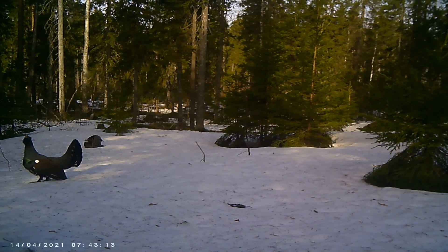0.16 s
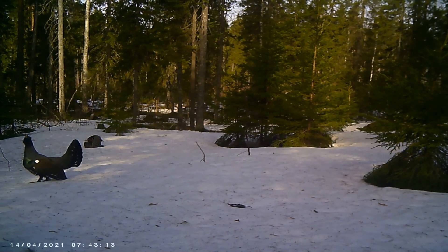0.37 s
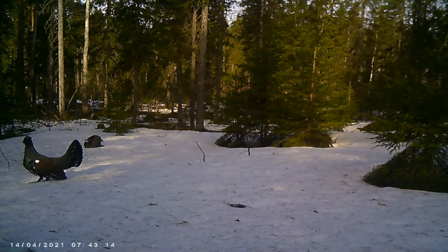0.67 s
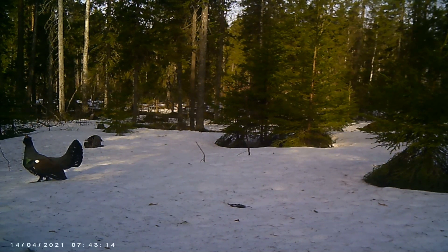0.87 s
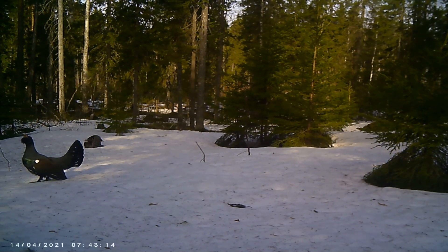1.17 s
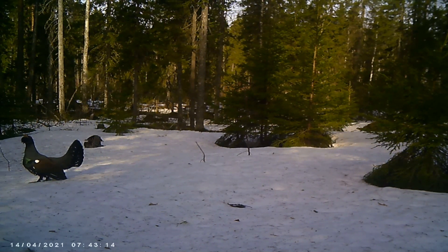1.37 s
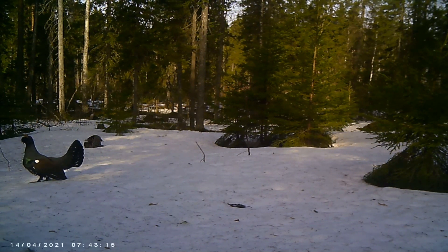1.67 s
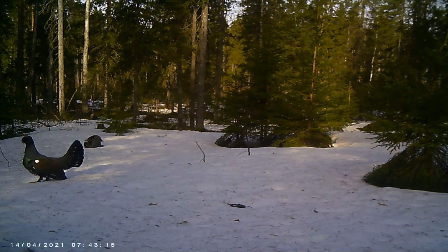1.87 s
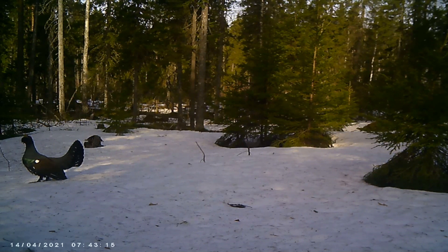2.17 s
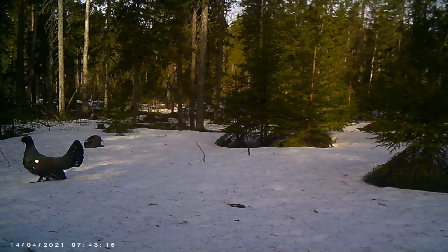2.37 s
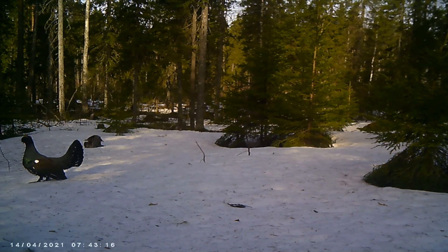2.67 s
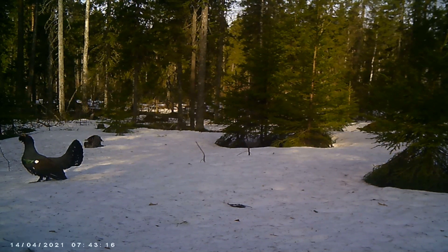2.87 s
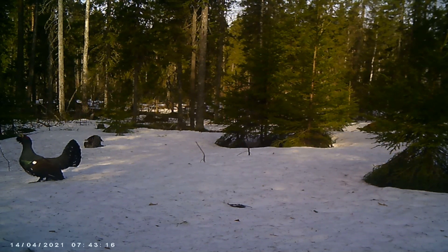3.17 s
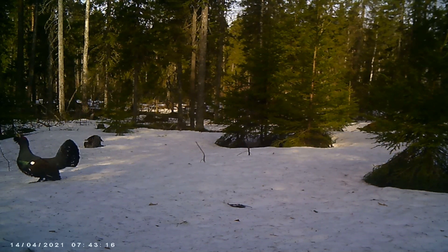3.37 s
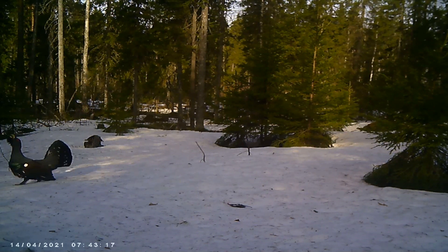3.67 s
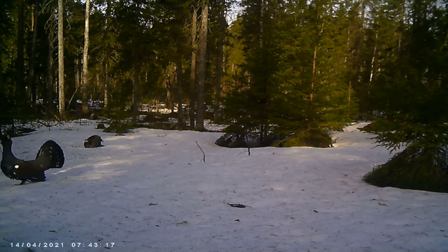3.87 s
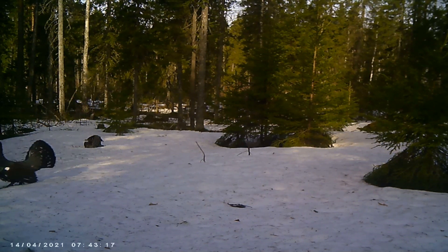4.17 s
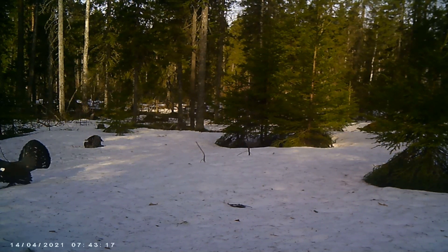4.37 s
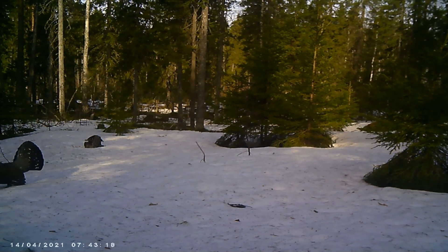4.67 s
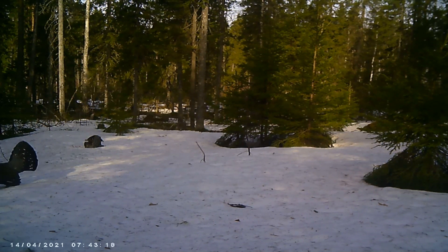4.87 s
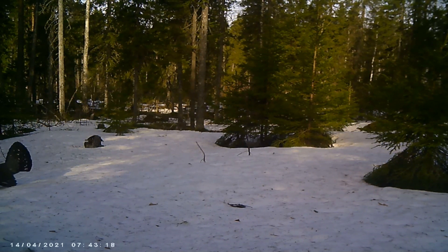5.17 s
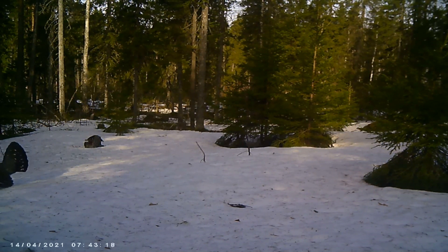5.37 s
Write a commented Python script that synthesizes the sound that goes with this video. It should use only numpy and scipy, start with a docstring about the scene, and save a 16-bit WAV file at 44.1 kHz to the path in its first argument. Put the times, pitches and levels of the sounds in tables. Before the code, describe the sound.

A large forest bird gives dry clicks that quicken into a trill, then hissing scrapes, over faint hiss and low rumble.

```python
"""A snowy forest edge, a displaying capercaillie close to the microphone of a trail camera.
Pairs of dry clicks ring its windpipe and speed up into a trill; then it whets, air rasping through
throat and beak in hissing scrapes, and steps through the crust. Farther off the trees answer faintly.
Underneath lie the camera's own hiss, rumble, thin whine and low bumps, and at first a brief whistle."""
import sys
import numpy as np
from scipy import signal
from scipy.fft import rfft, irfft, next_fast_len
from scipy.io import wavfile
from scipy.ndimage import map_coordinates

SR = 44100
rng = np.random.default_rng(int(sys.argv[2]) if len(sys.argv) > 2 else 0)


def bounce(signal):
    """Save signal as a 16-bit WAV file at the path given by the first command-line argument."""
    frames = np.transpose(np.atleast_2d(signal))
    limited = np.clip(frames, -1, 1)
    pcm = np.round(limited * 32767).astype(np.int16)
    wavfile.write(sys.argv[1], SR, pcm)


N = 243873
TIME = np.arange(N) / SR

# Levels in the tables are relative; each source sets its own gain.
# the camera's hiss and rumble spectra: f/Hz, level/dB
CAMERA_HISS = [(59, -40), (100, 4.5), (140, -5.5), (477, -9), (1160, -18.5), (2180, -22), (2520, -24.5),
               (5280, -26), (9950, -28), (11300, -26), (12000, -30), (14200, -29), (15500, -38.5)]
CAMERA_RUMBLE = [(15, 10), (40, 0.5), (65, 2.5), (110, -17.5), (200, -14.5), (400, -41.5)]
# one cycle of low bumps in the camera: t/s, level/dB
CAMERA_BUMPS = [(0.18, -40), (0.261, -35.5), (0.596, -35.5), (0.734, -43), (.979, -35), (1.148, -40),
                (1.217, -35), (1.376, -41), (1.539, -36), (1.771, -44), (1.941, -36)]
# tones of the thin whistle: f/Hz, level/dB
WHISTLE_TONES = [(2140, -80.5), (4110, -75), (6290, -79)]
# reverberation among the trees: f/Hz, time to fall 60 dB/s
FOREST_DECAY = [(300, 1), (2500, 0.42), (5000, 0.35), (10000, 0.71)]
# crunches underfoot: t/s, level/dB, length/s
FOOTFALLS = [(3.483, -59, 0.031), (3.54, -66, 0.036), (3.86, -57.5, 0.023), (3.906, -56, 0.015),
             (3.949, -53.5, 0.027), (4.052, -58.5, 0.022), (4.211, -55.5, 0.056), (4.281, -48.5, 0.0051),
             (4.675, -47, 0.023), (4.784, -56, 0.023), (4.876, -52, 0.041), (5.075, -49.5, 0.021),
             (5.097, -53, 0.014), (5.387, -58, 0.0097), (5.525, -59, 0.024)]
# spectrum of crushed snow: f/Hz, level/dB
SNOW_SPECTRUM = [(120, 18), (280, 6), (500, 2), (1200, 2), (3500, 1.5), (6000, 4), (10000, 4.5),
                 (13000, -2.5), (15500, -20)]
# whetting strokes: t/s, hold/s, throat level/dB, hiss level/dB, beak level/dB, swell over the hold/dB,
# throat start f/Hz, throat end f/Hz, beak f/Hz
WHET_STROKES = [(4.02, .006, -61.5, -52.5, -64, 3.5, 2470, 2600, 7850),
                (4.114, 0.0457, -54.5, -59.5, -62, -1, 2482, 2170, 9100),
                (4.264, 0.02, -60, -50, -60, 2.5, 2487, 2800, 8606),
                (4.346, .017, -41, -44.5, -53, 3.5, 2192, 2830, 8204),
                (4.454, 0.014, -45, -49, -50.5, 0, 2790, 2320, 8550),
                (4.543, 0.015, -73.5, -59.5, -73.5, -0.5, 2158, 2210, 7500),
                (4.583, 0.0217, -42.5, -42, -53.5, -1, 2577, 3043, 8250),
                (4.666, .036, -41, -43, -65, -6, 2876, 2139, 7980),
                (4.716, 0.031, -43, -43.5, -55.5, 0, 2620, 2430, 8700),
                (4.881, 0.038, -41, -44, -53.5, 0, 2522, 2727, 8040),
                (4.921, 0.01596, -38, -48, -48, 1, 2694, 3160, 7390),
                (4.978, 0.0065, -56, -57.5, -61, 0, 2536, 2470, 9240),
                (5.082, 0.017, -45, -44.5, -53.5, -3.5, 2750, 3006, 8550),
                (5.166, 0.015, -47, -48.5, -57, 2.5, 2430, 2832, 8570),
                (5.243, 0.067, -42.5, -44, -53, -3.5, 2637, 2257, 8220)]
# three sets of resonances that glide together: ratio to the main one, width/Hz, level/dB
THROAT_BANDS = [(.73, 240, -6.5), (1, 250, 0), (1.19, 280, -9), (1.48, 420, -14)]
HISS_BANDS = [(.84, 300, -4.5), (.975, 380, 0), (1.07, 280, -1.5)]
BEAK_BANDS = [(1, 450, 0), (1.13, 600, -10), (1.32, 1300, -15)]
# broad turbulence under the throat resonances: f/Hz, level/dB
TURBULENCE_SPECTRUM = [(1250, -6.5), (1700, -13), (3100, -13), (4000, -3), (5200, -9), (6200, -2.5)]
# the bird's clicks: t/s, ring level/dB, crack level/dB, thump level/dB, thump f/Hz,
# windpipe pitch ratio, fullness 0-1, damping of the middle modes/dB
CLICK_SNAPS = [(1.158, -31, -39.5, -47.5, 420, 1.07, .8, -2.5),
               (1.3114, -42, -46, -48, 427, 1.005, 0.95, 2),
               (2.1564, -32.5, -43, -49.5, 312, 1.026, 0.71, -3.5),
               (2.3003, -31, -42, -42.5, 310, 1.037, 0.63, 27), (2.8225, -30, -44, -45, 327, 1.02, .44, -3),
               (2.9356, -36.5, -47, -42.5, 323, 1.01, 0.5, 31),
               (3.217, -29.5, -50.5, -44, 310, 1.034, 0.26, -0.5),
               (3.3022, -42, -48.5, -46, 317, 0.98, 0.61, -2),
               (3.4805, -31, -46, -44, 307, 1.034, 0.18, -1),
               (3.5373, -43.5, -51, -42, 320, .965, 0.6, -5.5),
               (3.6534, -31.5, -43.5, -44, 300, 1.03, 0.07, -2.5),
               (3.7545, -31, -44.5, -47.5, 305, 0.99, 0.1, 5.5),
               (3.8042, -34, -48, -44, 289, 0.96, 0.02, -2),
               (3.8487, -34, -48, -47.5, 285, .94, 0.04, -2.5)]
# spectrum of a click's crack: f/Hz, level/dB
CRACK_SPECTRUM = [(700, -13), (1300, -4.5), (3300, -5), (3900, -7.5), (4600, 0), (6200, -2), (6900, -10),
                  (8100, -3.5), (10000, -16.5), (12500, -14.5), (15500, -72)]
# windpipe modes in a thin click, and what a full click adds:
# f/Hz, level/dB, added f/Hz, added level/dB, share of the damping 0-1
WINDPIPE_MODES = [(1062, -28, 530, 41, 0), (1848, -15, 237, 22, 0.2), (2534, -3, 91, 7.5, 1),
                  (2840, -13, 100, 10, 1), (3144, 2.5, 0, -2.5, 0.05), (3360, 1, -9, -3, 0.21),
                  (4430, -17, 600, -17, 0)]


def amp(db):
    """Decibels to gain."""
    return 10 ** (np.asarray(db) / 20)


def unit(x):
    """Scale to rms 1."""
    return x / np.sqrt(np.mean(x ** 2) + 1e-20)


def along(points, hz):
    """Read (f/Hz, value) points on a log frequency axis."""
    point_hz, values = np.transpose(points)
    return np.interp(np.log(hz + 1), np.log(point_hz), values)


def shape(points, hz):
    """Gain of a (f/Hz, level/dB) spectrum that falls away steeply past its ends."""
    skirts = np.minimum(hz / points[0][0], 1) * np.minimum(points[-1][0] / (hz + 1), 1)
    return amp(along(points, hz)) * skirts ** 4


def filtered(x, response):
    """Filter x by a response given as a function of frequency."""
    size = next_fast_len(len(x) + SR // 2)
    return irfft(rfft(x, size) * response(np.fft.rfftfreq(size, 1 / SR)), size)[:len(x)]


def noise(points):
    """Coloured noise of rms 1."""
    return unit(filtered(rng.standard_normal(N), lambda hz: shape(points, hz)))


def wobble(rate):
    """A smooth random curve, rate knots a second."""
    return map_coordinates(rng.standard_normal(int(N * rate / SR) + 4), [TIME * rate])


def add(track, start_s, sound):
    """Mix a sound in at start_s."""
    part = track[round(start_s * SR):][:len(sound)]
    part += sound[:len(part)]


def camera_noise(bump_cycle_s=2, whine_hz=11245, faint_whine_hz=5160):
    """The electronics hiss, rumble and whine; bumps recur, each a short sag that lifts the hiss."""
    sags, surge, t = np.zeros(N), np.zeros(N), TIME[:SR // 5]
    for cycle_s in np.arange(0, N / SR, bump_cycle_s):
        for at_s, db in CAMERA_BUMPS:
            add(sags, cycle_s + at_s, -amp(db + 3.5) * ((t < .031) + 1.24 * (t < .062)))
            add(surge, cycle_s + at_s, amp(db + 38.5) * np.exp(-(t / .085) ** 4))
    # a 9-55 Hz band-pass rounds the sags into bumps
    bumps = filtered(sags, lambda hz: (1j * hz / (9 + 1j * hz)) ** 2 / (1 + 1j * hz / 55) ** 2)
    hiss = noise(CAMERA_HISS) * amp(-62.5 + .89 * wobble(10)) * (1 + .45 * surge)
    rumble = noise(CAMERA_RUMBLE) * amp(-54.5 + .39 * wobble(3.6)) * (1 + .09 * surge)
    polarity = np.tanh(4 * np.sin(2 * np.pi * 43.07 * TIME))  # flips split the whine into close lines
    whine = amp(-72) * polarity * np.sin(2 * np.pi * whine_hz * TIME)
    faint_whine = amp(-83) * np.sin(2 * np.pi * faint_whine_hz * TIME + wobble(60))
    return amp(-2.5) * bumps + hiss + rumble + whine + faint_whine


def whistle():
    """A faint thin whistle that stops almost at once."""
    tones = sum(amp(db) * np.sin(2 * np.pi * hz * TIME + .5 * wobble(97)) for hz, db in WHISTLE_TONES)
    return amp(2.5) * tones * np.interp(TIME, [.08, .1], [1, 0])


def forest_echo(bird):
    """A diffuse echo from trunks and spruces, its random scatter drawn afresh every quarter second."""
    out, block = np.zeros(N), SR // 4
    colour = [(200, -3.5), (1300, -2), (3000, 3.5), (5000, 2), (12000, -1.5)]  # f/Hz, level/dB
    for start in range(0, N, block):
        hz, t, scatter = signal.stft(rng.standard_normal(SR // 2), SR, nperseg=256)
        spruces = 1 + .3 * np.exp(-((t - .076) / .0011) ** 2)  # one slightly stronger reflection
        decay = amp(-60 * t / along(FOREST_DECAY, hz)[:, None])
        tail = signal.istft(scatter * shape(colour, hz)[:, None] * spruces * decay, SR, nperseg=256)[1]
        echo = signal.fftconvolve(bird[start:start + block], tail / np.linalg.norm(tail))
        add(out, start / SR + .005, echo)
    return out


def snow_steps():
    """Each footfall crushes a cloud of tiny ice grains."""
    pressure = sum(amp(db) * np.exp(-2 * ((TIME - at_s) / length_s) ** 2)
                   for at_s, db, length_s in FOOTFALLS)
    grains = unit(noise(SNOW_SPECTRUM) * amp(1.3 * wobble(1500)))
    return pressure * grains


def resonant_air(resonances, main_hz):
    """Noise of rms 1 in steep-sided resonances that glide with main_hz."""
    out, turns = np.zeros(N), np.cumsum(main_hz) / SR
    for ratio, width_hz, db in resonances:
        # slow noise on a gliding carrier makes a band of that width
        lowpass = lambda hz: 1 / np.sqrt(1 + (2 * hz / width_hz) ** 2) / (1 + (hz / width_hz / 1.5) ** 4)
        phase = 2 * np.pi * ratio * turns
        band = sum(filtered(rng.standard_normal(N), lowpass) * carrier
                   for carrier in (np.cos(phase), np.sin(phase)))
        out += amp(db) * unit(band)
    return unit(out)


def stroke(start_s, hold_s, throat_db, hiss_db, beak_db, swell_db, from_hz, to_hz, beak_hz):
    """Level and pitch curves of a scrape: rising, it creeps in and stops hard; falling, the reverse."""
    hard_s, soft_s = .012, .017 + .55 * hold_s
    attack_s, release_s = (soft_s, hard_s) if to_hz > from_hz else (hard_s, soft_s)
    before_s, after_s = np.maximum(start_s - TIME, 0), np.maximum(TIME - start_s - hold_s, 0)
    fade_db = 30.5 * (before_s / attack_s + after_s / release_s)
    slow_fade_db = fade_db / 1.08  # hiss and beak have longer edges than the throat
    progress = (TIME - start_s) / hold_s
    push_db = swell_db * (np.clip(progress, 0, 1) - .5)
    glide = (to_hz / from_hz) ** (np.clip(progress, -.34, 1.34) - .5)  # carries on into the edges
    return np.array([throat_db + push_db - fade_db,
                     hiss_db + push_db - slow_fade_db,
                     beak_db + push_db - slow_fade_db,
                     np.sqrt(from_hz * to_hz) * glide,
                     beak_hz / glide ** .48])  # the beak resonance falls as the throat rises


def whetting():
    """Air rasps through the throat and beak, whose resonances glide within each stroke."""
    controls = stroke(*WHET_STROKES[0])
    for row in WHET_STROKES[1:]:
        following = stroke(*row)
        controls = np.where(following[0] > controls[0], following, controls)  # the louder one takes over
    throat_db, hiss_db, beak_db, throat_hz, beak_hz = controls
    turbulent_share = np.interp(throat_db, [-55, -40], [.15, .36])  # harder blowing is noisier
    turbulence = turbulent_share * noise(TURBULENCE_SPECTRUM)
    throat = amp(throat_db) * (resonant_air(THROAT_BANDS, throat_hz) + turbulence)
    hiss = amp(hiss_db + .9) * resonant_air(HISS_BANDS, 5400 + .17 * throat_hz)
    beak = amp(beak_db + 3) * resonant_air(BEAK_BANDS, beak_hz)
    sputter = unit(amp(1.1 * wobble(500)))
    return sputter * (throat + hiss + beak)


def windpipe_ring(t, ring_db, crack_db, pitch, fullness, damping_db, ring_s=.0068, tail_s=.0097):
    """The windpipe rings for a few milliseconds; full clicks have stronger, higher low modes."""
    thin_hz, thin_db, added_hz, added_db, damping_share = np.transpose(WINDPIPE_MODES)
    mode_hz = pitch * (thin_hz + fullness * added_hz)
    mode_db = ring_db + thin_db + fullness * added_db - damping_db * damping_share
    modes = sum(amp(db) * np.sin(2 * np.pi * hz * t + rng.normal(0, 1))
                for hz, db in zip(mode_hz, mode_db))
    # higher overtones lie about evenly and sink with the low ones as the windpipe stretches
    upper_hz = (570 + .1 * mode_hz[1]) * (np.arange(5, 18) + rng.normal(0, .1, size=13))
    upper_gains = shape(CRACK_SPECTRUM, upper_hz) * amp(rng.uniform(-4, 4, size=len(upper_hz)))
    upper_tones = np.sin(2 * np.pi * (upper_hz[:, None] * t + rng.random((len(upper_hz), 1))))
    overtones = amp(crack_db - 3) * upper_gains @ upper_tones
    attack = 1 - np.exp(-t / .0001)
    decay = np.exp(-(t / ring_s) ** 2) + .05 * np.exp(-t / tail_s)
    return attack * decay * (amp(-4.5) * modes + overtones)


def throat_thump(t, db, hz):
    """The swollen throat gives one low, quickly damped note."""
    envelope = (1 - np.exp(-t / .0031)) ** 2 * amp(-60 * t / .043)
    return amp(db) * envelope * np.sin(2 * np.pi * hz * t)


def clicks(rebound_s=.0043):
    """Each snap cracks, rings the windpipe and thumps the throat."""
    out, t = np.zeros(N), TIME[:SR // 16]
    rebound = (t > rebound_s) * np.exp(-abs(t - rebound_s) / .001)  # the snap comes back weaker
    burst = 1.5 * np.exp(-t / .0006) + .55 * np.exp(-t / .008) + .6 * rebound
    crack_noise = noise(CRACK_SPECTRUM)
    for at_s, ring_db, crack_db, thump_db, thump_hz, pitch, fullness, damping_db in CLICK_SNAPS:
        crack = amp(crack_db - 2.5) * burst * crack_noise[round(at_s * SR):][:len(t)]
        ring = windpipe_ring(t, ring_db, crack_db, pitch, fullness, damping_db)
        add(out, at_s, crack + ring + throat_thump(t, thump_db + 10.5, thump_hz))
    add(out, 3.888, throat_thump(t, db=-34.5, hz=264))  # the trill ends with a bare thump
    return out


def scene():
    """The bird close by and the trees behind it, in mono over the camera's own noise."""
    bird = clicks() + whetting() + snow_steps()
    return (bird + amp(-20.5) * forest_echo(bird) + camera_noise() + whistle())[None]


def record(dry):
    """The camera keeps nothing above its band limit."""
    top_hz = 15750
    return np.array([filtered(channel, lambda hz: hz < top_hz) for channel in dry])


dry = scene()
out = record(dry)
bounce(out)
```